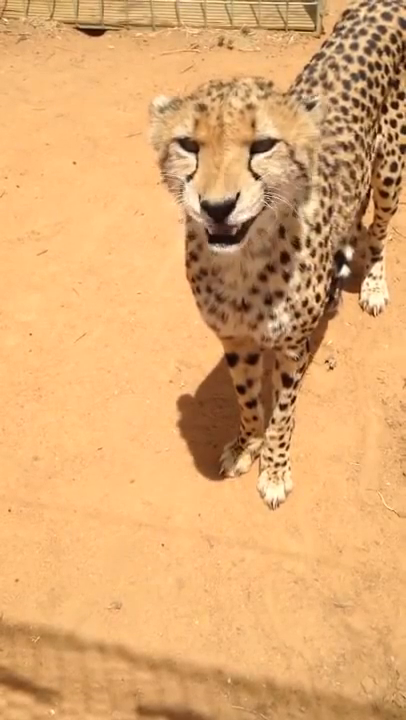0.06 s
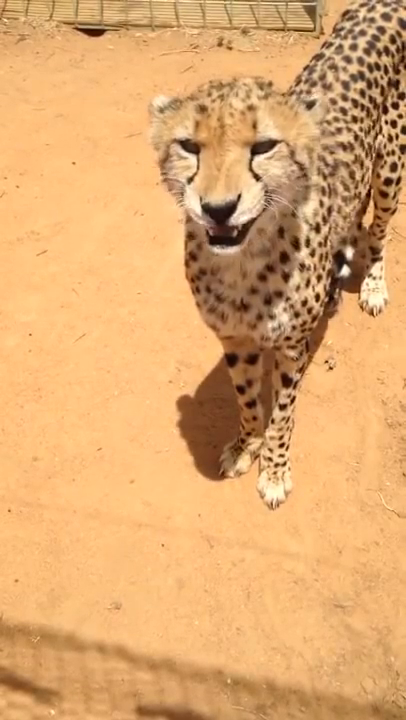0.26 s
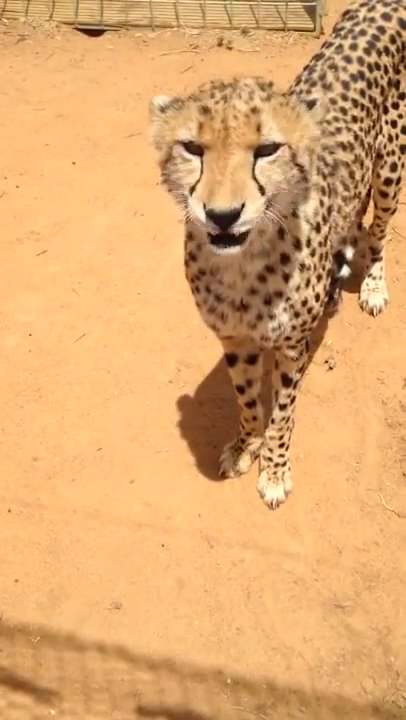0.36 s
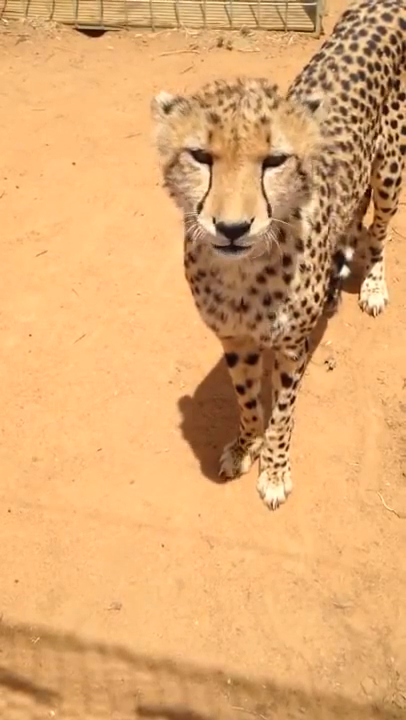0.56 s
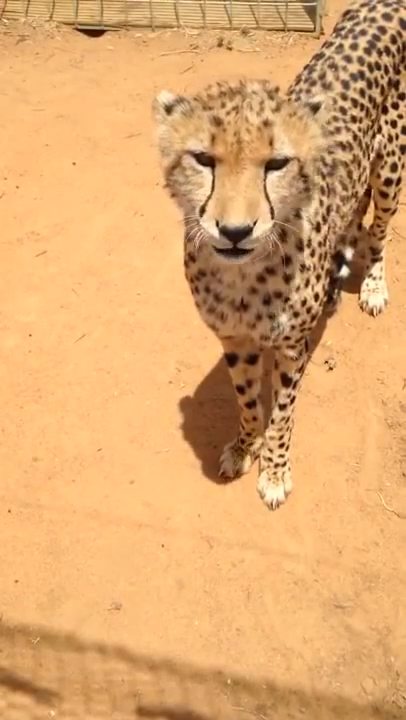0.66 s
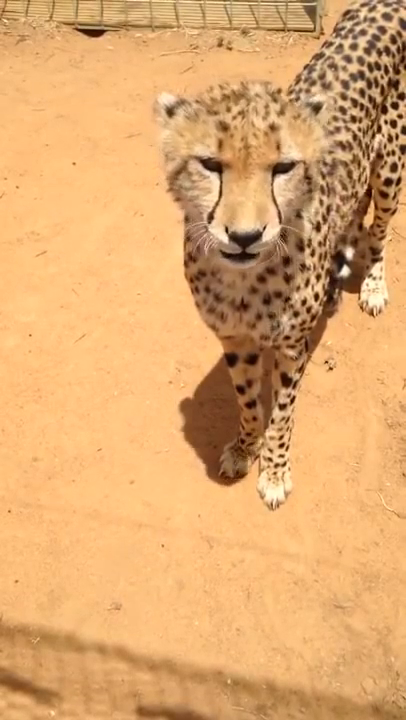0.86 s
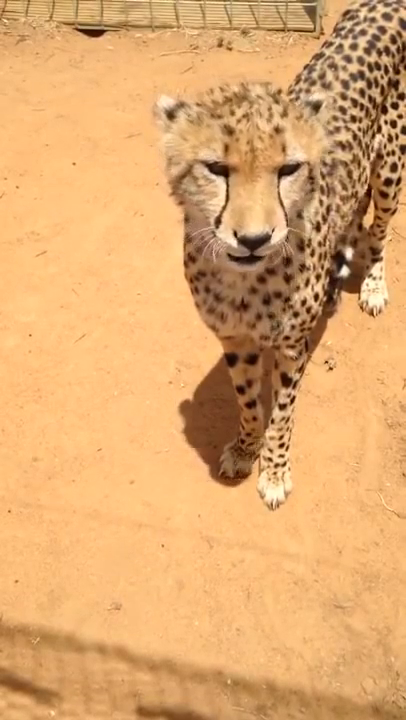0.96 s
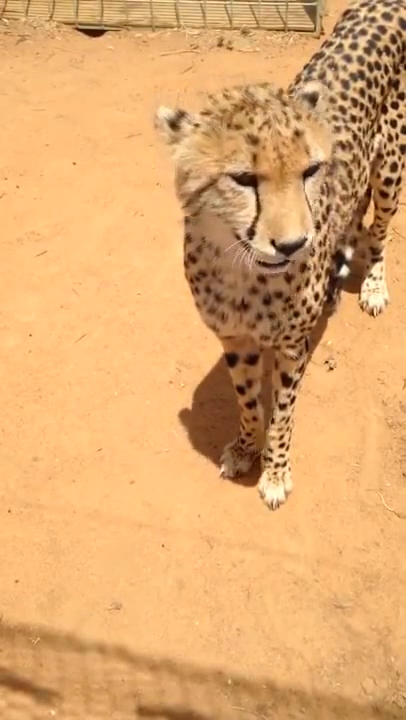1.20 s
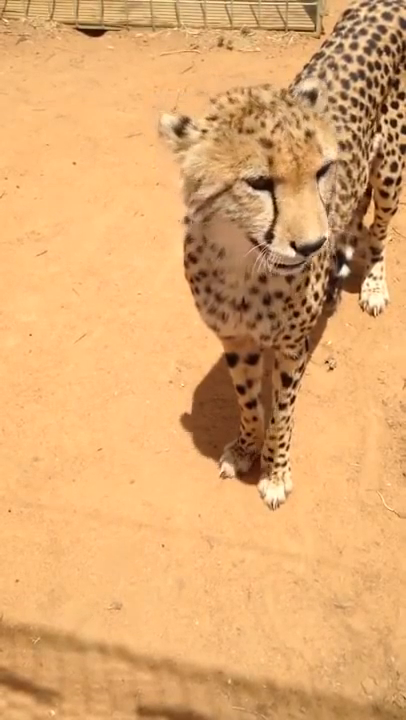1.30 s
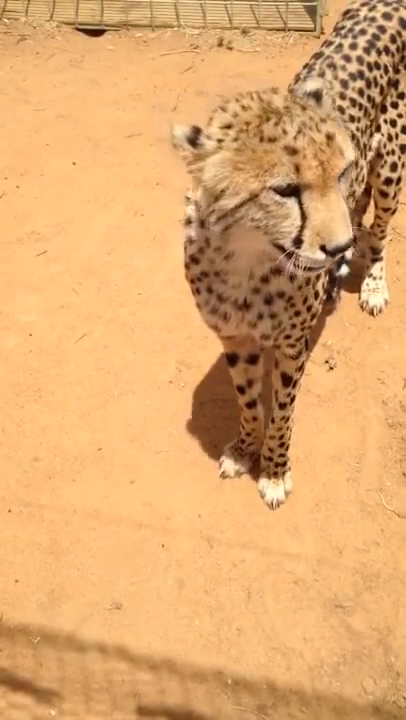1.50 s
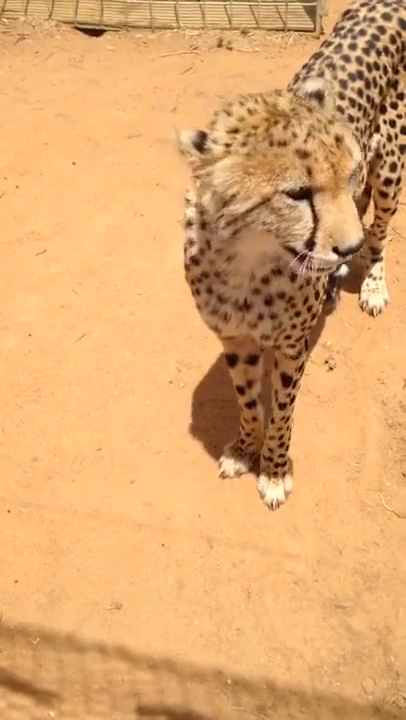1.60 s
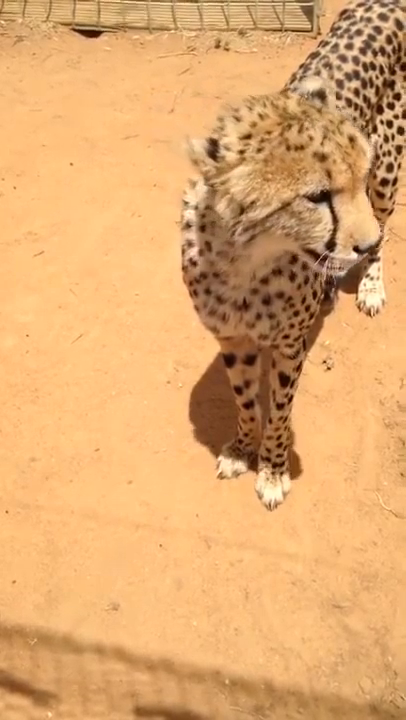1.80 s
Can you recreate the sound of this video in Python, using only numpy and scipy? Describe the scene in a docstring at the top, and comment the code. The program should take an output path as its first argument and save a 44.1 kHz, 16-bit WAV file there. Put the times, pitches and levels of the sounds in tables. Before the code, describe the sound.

A cheetah meows once, close and dry, in a quiet open yard. Faint wet mouth clicks come at 0.05 seconds; the high, almost whistled call runs from 0.19 to 0.67, arching up, then falling and roughening slightly, with a nasal puff at 0.7. A thin insect buzz continues throughout. Faint birds chirp, clearest near 1.36. Two small hollow knocks near the microphone land at 1.7 and 1.8.

```python
"""Cat meow in a yard

A cat gives one near-pure, arching meow close by: a gliding sine whose overtones change as the mouth shuts.
Split fold cycles and rasp roughen it briefly; wet clicks precede it and a puff of nasal noise ends it. An
insect buzzes high (toothed wings as a pulse train) and small birds chirp further off (gliding sines). Filtered
noise is the quiet open air; late on, two small knocks (damped resonances) sound near the microphone."""
import sys
import numpy as np
from scipy import signal
from scipy.fft import rfft, irfft
from scipy.io import wavfile
from scipy.ndimage import uniform_filter1d

SR = 44100
rng = np.random.default_rng(int(sys.argv[2]) if len(sys.argv) > 2 else 0)


def log_audio(samples):
    """Write samples as a 16-bit WAV file to the path given in sys.argv[1]."""
    # one column per channel
    frames = np.atleast_2d(samples).T
    # limit to full scale, then quantise
    limited = np.clip(frames, -1, 1)
    pcm = np.round(limited * 32767).astype(np.int16)
    wavfile.write(sys.argv[1], SR, pcm)


N = 81585  # samples


def undb(db):
    """Decibel law: level to amplitude gain."""
    return 10 ** (np.asarray(db) / 20)


def unit(x):
    """Energy normalisation: scale to rms 1."""
    return x / np.sqrt(np.mean(x ** 2))


def peaked(x):
    """Peak normalisation: scale to peak 1."""
    return x / np.abs(x).max()


def times():
    """Uniform sampling: the time of every sample in seconds."""
    return np.arange(N) / SR


def curve(rows):
    """Linear interpolation: join (time, value) rows by straight lines."""
    return np.interp(times(), *np.array(rows, float).T)


def gain_at(hz, points):
    """Spectral envelope: gain from (Hz, dB) points, interpolated over log frequency."""
    point_hz, db = np.array(points, float).T
    log_hz = np.log(np.maximum(hz, 1))
    return undb(np.interp(log_hz, np.log(np.maximum(point_hz, 1)), db))


def colour(x, points):
    """Linear filtering: shape the spectrum by (Hz, dB) points, then scale to rms 1."""
    gain = gain_at(np.fft.rfftfreq(N, 1 / SR), points)
    return unit(irfft(rfft(x) * gain, N))


def noise():
    """White noise: equal mean power at every frequency."""
    return rng.standard_normal(N)


def walk(rate):
    """Random modulation: noise smoothed twice over 1/rate seconds, with rms 1."""
    width = max(int(SR / rate), 1)
    smooth = uniform_filter1d(noise(), width)
    return unit(uniform_filter1d(smooth, width))


def ring(x, hz, width_hz):
    """Simple resonance: a bandpass with gain 1 at its centre."""
    return signal.lfilter(*signal.iirpeak(hz, hz / width_hz, fs=SR), x)


def ring_twice(x, hz, width_hz):
    """Cascaded resonance: the same bandpass twice, for steeper skirts."""
    return ring(ring(x, hz, width_hz), hz, width_hz)


def impulse(at):
    """Impulsive excitation: one unit sample at the given time."""
    return signal.unit_impulse(N, min(int(at * SR), N - 1))


def half_sine_swell(start, length):
    """Smooth onset and release: the square root of half a sine, zero outside its span."""
    along = np.clip((times() - start) / length, 0, 1)
    return np.sqrt(np.abs(np.sin(np.pi * along)))


def echoes(x, t60):
    """Diffuse scattering from ground, fence and bushes: convolution with decaying noise."""
    tail = noise() * np.exp(-np.log(1000) * times() / t60)
    return signal.fftconvolve(x, tail / np.linalg.norm(tail))[:N]


# spectrum of the open air: (frequency [Hz], relative density [dB per Hz])
AIR_SPECTRUM = [(20, -33.5), (40, -10.5), (70, -5.5), (130, -4.5), (250, -9.5), (400, -12), (835, -17.5),
                (1260, -19.5), (1660, -19), (2950, -21), (6000, -25), (7800, -48)]
AIR_DB, HISS_DB = -70.5, -76


def air():
    """Broadband noise: quiet open air, gently stirring in level, over an even hiss."""
    lowpass = signal.butter(4, 6500, fs=SR, output="sos")
    low = signal.sosfilt(lowpass, colour(noise(), AIR_SPECTRUM))
    return undb(AIR_DB + .3 * walk(5)) * low + undb(HISS_DB) * noise()


# mean tooth rate, before the stroke's speed ratio: (time [s], strikes per second [1/s])
TOOTH_RATE = [(0, 687), (.15, 679), (.25, 697), (.45, 679), (.58, 684), (.78, 682), (.95, 692), (1.08, 680),
              (1.23, 674), (1.31, 699), (1.5, 694), (1.68, 679), (1.85, 682)]
# course of the buzz, before INSECT_TRIM_DB: (time [s], level [dB])
INSECT_LEVEL = [(0.0, -58), (0.182, -57), (0.19, -60), (0.504, -61), (0.532, -63), (0.786, -60),
                (1.436, -60), (1.68, -62)]
# one wing stroke: (share of the beat [0-1], tooth speed ratio [1], level [dB])
STROKE = [(0, .985, -15), (.12, .988, -1.5), (.35, .995, 0), (.56, 1.014, -4), (.73, 1.011, -1.5),
          (.88, .987, -6), (1, .975, -15)]
# radiation of the wing: (frequency [Hz], relative gain [dB])
WING_COLOUR = [(6100, -40), (6850, -21.5), (7500, -9), (8200, -3), (8900, -14), (9600, -25), (10400, -34.5),
               (11500, -53)]
INSECT_TRIM_DB, INSECT_ECHO_DB = -2, -6
WINGBEAT_HZ, TOOTH_JITTER, TOOTH_SCATTER_DB = 58, .004, 1


def insect():
    """Stridulation: each wingbeat drags teeth over a scraper, speeding up and then braking."""
    beats = np.cumsum(WINGBEAT_HZ * (1 + .02 * walk(11))) / SR
    beat = beats.astype(int)
    share, speeds, levels = np.array(STROKE).T
    speed = np.interp(beats % 1, share, speeds)
    press_db = np.interp(beats % 1, share, levels)
    # every beat draws its own tooth phase, loudness and speed
    offset, size, haste = rng.standard_normal((beat.max() + 1, 3))[beat].T
    rate = curve(TOOTH_RATE) * speed * (1 + 0.0059 * haste + TOOTH_JITTER * walk(400))
    teeth = 2 * np.pi * (np.cumsum(rate) / SR + offset)
    # only the harmonics within the wing's band
    strikes = sum(np.cos(k * teeth) for k in range(9, 17))
    pressed = strikes * undb(press_db + 0.92 * size + TOOTH_SCATTER_DB * walk(500))
    song = colour(pressed, WING_COLOUR)
    blurred = unit(song + undb(INSECT_ECHO_DB) * echoes(song, .12))
    return undb(curve(INSECT_LEVEL) + INSECT_TRIM_DB) * blurred


# wet clicks of the opening mouth: (time [s], peak level [dB])
SMACKS = [(.046, -42.5), (0.049, -44.5), (0.0555, -47), (.058, -50), (0.0634, -45), (0.0683, -50.5)]
# modes of the mouth, before a random detuning: (frequency [Hz], t60 [s], relative level [dB])
SMACK_MODES = [(1210, 0.0044, -40), (1720, 0.017, 7.5), (2820, 0.0028, 13), (5030, 0.0047, 3)]


def smacks():
    """Modal ringing: tongue and lips part in a few clicks that excite the mouth's damped modes."""
    out = 0
    spreads = rng.standard_normal((len(SMACKS), len(SMACK_MODES)))
    for (at, db), spread in zip(SMACKS, spreads):
        age = np.maximum(times() - at, 0)
        click = 0
        for (hz, t60, mode_db), s in zip(SMACK_MODES, spread):
            decay = np.exp(-np.log(1000) * age / t60)
            click = click + undb(mode_db) * decay * np.sin(2 * np.pi * hz * (1 + 0.088 * s) * age)
        out = out + undb(db) * peaked(click)
    return out


# bird chirps, level before flutter and envelope: (time [s], length [s], start frequency [Hz],
# frequency approached [Hz], level [dB], glide time constant as share of the length [1])
CHIRPS = [(.088, 0.02, 5430, 2780, -74, 0.65), (0.775, 0.026, 4070, 2310, -74, 0.68),
          (0.793, 0.044, 3180, 2690, -79.5, 0.42), (0.843, 0.043, 1900, 2055, -77, 0.41),
          (0.902, 0.15, 1665, 1743, -79.5, 0.3), (0.974, 0.033, 4480, 2640, -72, 0.88),
          (1.182, 0.053, 1557, 2980, -72.5, 0.67), (1.184, 0.057, 3260, 2760, -73, .4),
          (1.234, 0.0587, 3235, 2595, -73, 0.64), (1.349, .009, 4200, 6340, -70.5, 0.76),
          (1.361, 0.089, 7040, 3490, -57, 0.23), (1.508, 0.0105, 5250, 2560, -63, 0.8),
          (1.519, 0.034, 2820, 2540, -73.5, 0.43), (1.523, 0.035, 4110, 1100, -76, 0.71)]
CHIRP_PEAK_SHARE, CHIRP_FLUTTER_DB = 0.4, 2.5
BIRD_ECHO_DB, BIRD_ECHO_T60_S = -5, 0.19


def birds():
    """Frequency modulation: thin whistles glide exponentially, blurred by distance."""
    out = 0
    for at, length, from_hz, to_hz, db, glide in CHIRPS:
        along = np.clip((times() - at) / length, 0, 1)
        hz = to_hz + (from_hz - to_hz) * np.exp(-along / glide)
        shape = np.interp(along, [0, CHIRP_PEAK_SHARE, 1], [0, 1, 0]) ** 1.1
        whistle = np.sqrt(2) * np.sin(2 * np.pi * np.cumsum(hz) / SR)
        out = out + undb(db + CHIRP_FLUTTER_DB * walk(250)) * shape * whistle
    return out + undb(BIRD_ECHO_DB) * echoes(out, BIRD_ECHO_T60_S)


# the call's fundamental, before jitter and shimmer: (time [s], pitch [Hz], level [dB])
MEOW = [(0.186, 822.6, -74), (.199, 858.4, -37), (0.214, 873.3, -38), (.24, 901.4, -34),
        (0.302, 924.3, -31.5), (.37, 952.3, -27.5), (.4, 950, -27.5), (0.461, 930, -30), (.505, 905.8, -32),
        (0.546, 903.6, -31), (0.584, 861, -35.5), (0.616, 834.7, -36), (0.645, 774.5, -34.5),
        (0.651, 757, -41), (0.657, 690, -38.5), (.666, 650, -50)]
# closing of the mouth: (time [s], closure [0 open - 1 shut])
MOUTH = [(.22, 0.38), (.4, 0.021), (.47, 0.66), (.53, 0.88), (.575, 0.95), (.66, 1)]
# overtones against the fundamental, mouth open: (frequency [Hz], level [dB])
OPEN_MOUTH = [(1650, -24.5), (1820, -50.5), (1900, -35), (2700, -19), (2850, -32), (3700, -57.5),
              (4700, -48), (5400, -52.5), (5650, -73.5), (6600, -53.5), (7600, -59)]
# overtones against the fundamental, mouth shut: (frequency [Hz], level [dB])
SHUT_MOUTH = [(1400, -23.5), (1600, -33), (1700, -14), (1830, -20.5), (2600, -34), (3350, -25), (3650, -31),
              (4300, -52), (5000, -45), (5200, -26.5), (5450, -40.5), (5650, -60.5), (7600, -60)]
# rasp in the voice: (time [s], level against the tone [dB])
RASP = [(.19, -46.5), (.26, -46), (.4, -50), (.45, -34), (.55, -36), (.61, -40), (.649, -29.5), (.657, -15)]
# spectrum of the rasp: (frequency [Hz], relative density [dB per Hz])
RASP_COLOUR = [(200, -21), (800, 3), (1500, -7), (2200, -0.5), (3000, -13), (4700, -9), (6000, -26.5),
               (12000, -43)]
# the folds fall into a longer cycle, level before colour and flutter:
# (start [s], end [s], periods per cycle [1], level [dB])
SPLITS = [(.42, 0.53, 3, -58.5), (0.49, .595, 2, -64)]
# tones between the harmonics: (frequency [Hz], relative level [dB])
SPLIT_COLOUR = [(300, -23), (700, -35), (1230, 3), (1400, -6), (1550, -8), (1800, -24.5), (2170, -17),
                (2500, -23), (4500, -37.5), (7000, -48.5)]
JITTER, SHIMMER_DB, OVERTONE_FLUTTER_DB = 0.0027, 0.35, 1  # jitter as share of the pitch
SPLIT_FLUTTER_DB, SPLIT_WANDER_RAD = 3, .1


def meow():
    """Source and filter: the closing mouth reshapes the overtones; split fold cycles add subharmonics."""
    t, rows = times(), np.array(MEOW)
    hz = curve(rows[:, :2]) * (1 + JITTER * walk(150))
    phase = 2 * np.pi * np.cumsum(hz) / SR
    sounding = (t > rows[0, 0]) * (t < rows[-1, 0])
    loud = undb(curve(rows[:, ::2]) + SHIMMER_DB * walk(180)) * sounding
    shut = np.clip(curve(MOUTH), 0, 1)
    voice = np.sin(phase)
    for k in range(2, 7):
        throat = gain_at(k * hz, OPEN_MOUTH) ** (1 - shut) * gain_at(k * hz, SHUT_MOUTH) ** shut
        voice = voice + throat * undb(OVERTONE_FLUTTER_DB * walk(73)) * np.sin(k * phase)
    # the rasp pulses once per fold cycle
    pulsed_noise = noise() * (1 + np.cos(phase))
    rasp = undb(curve(RASP)) * colour(pulsed_noise, RASP_COLOUR)
    out = loud * (np.sqrt(2) * voice + rasp)
    for start, end, periods, db in SPLITS:
        count = round(periods)
        slow = phase / count + SPLIT_WANDER_RAD * walk(90)
        between = 0
        for k in range(1, 6 * count):
            if k % count:  # skip the voice's own harmonics
                between = between + gain_at(k * hz / count, SPLIT_COLOUR) * np.sin(k * slow)
        swell = half_sine_swell(start, end - start)
        out = out + undb(db + SPLIT_FLUTTER_DB * walk(110)) * swell * between
    return out


# spectrum of the puff: (frequency [Hz], relative density [dB per Hz])
PUFF_COLOUR = [(80, -27), (250, 9.5), (600, 0.5), (1150, 4.5), (1700, -6), (2500, -3), (3500, -10),
               (4600, -17), (6000, -19.5), (12000, -62)]
PUFF_S, PUFF_ATTACK_S, PUFF_HOLD_S, PUFF_DECAY_S, PUFF_DB = .707, 0.0014, 0.033, 0.029, -58.5
NOSE_S, NOSE_LENGTH_S, NOSE_HZ, NOSE_WIDTH_HZ, NOSE_DB, LEAK_DB = 0.62, 0.13, 4540, 470, -73, -64.5


def puff():
    """Turbulent flow: air leaks through the nose as the call ends, then the rest is let out at once."""
    age = times() - PUFF_S
    decay = np.exp(-np.maximum(age - PUFF_HOLD_S, 0) / PUFF_DECAY_S)
    burst = np.clip(age / PUFF_ATTACK_S, 0, 1) * decay
    flow = half_sine_swell(NOSE_S, NOSE_LENGTH_S)
    nostrils = unit(ring_twice(noise(), NOSE_HZ, NOSE_WIDTH_HZ))
    strength = np.hypot(undb(PUFF_DB) * burst, undb(LEAK_DB) * flow)
    return strength * colour(noise(), PUFF_COLOUR) + undb(NOSE_DB) * flow * nostrils


LIP_S, LIP_DECAY_S, LIP_HZ, LIP_WIDTH_HZ, LIP_DB = .629, 0.00094, 4730, 1600, -49  # peak level


def lip_tick():
    """Transient excitation: a tiny noise burst rings bright at the mouth just before the call ends."""
    age = times() - LIP_S
    burst = noise() * (age > 0) * np.exp(-np.abs(age) / LIP_DECAY_S)
    return undb(LIP_DB) * peaked(ring_twice(burst, LIP_HZ, LIP_WIDTH_HZ))


# knocks near the microphone:
# (time [s], peak level of the body [dB], body pitch ratio [1], thud against the body [dB])
KNOCKS = [(1.6963, -36, 0.79, -25.5), (1.805, -30.5, 0.9, -17)]
KNOCK_HZ, KNOCK_WIDTH_HZ = 732, 430  # body centre before the pitch ratio
THUD_HZ, THUD_WIDTH_HZ = 108, 75
TICK_DB, RATTLE_DB, RATTLE_DECAY_S = -3.5, -19.5, 0.011  # levels against the body


def knocks():
    """Impact response: a sharp tick, a heavily damped hollow body, a low thud and a short rattle."""
    out = 0
    for at, db, ratio, thud_db in KNOCKS:
        hit, age = impulse(at), times() - at
        body = peaked(ring_twice(hit, KNOCK_HZ * ratio, KNOCK_WIDTH_HZ))
        tick = undb(TICK_DB) * peaked(ring(ring(hit, 3800, 8000), 4200, 7600))
        low = ring(ring(hit, THUD_HZ, THUD_WIDTH_HZ), THUD_HZ, 3 * THUD_WIDTH_HZ)
        thud = undb(thud_db) * peaked(low)
        grain = unit(ring(ring(noise(), 520, 600), 660, 2100))
        rattle = undb(RATTLE_DB) * grain * (age > 0) * np.exp(-np.abs(age) / RATTLE_DECAY_S)
        out = out + undb(db) * (tick - body + thud + rattle)
    return out


YARD_DB, YARD_T60_S = -39, 0.11


def scene():
    """Superposition: the cat with its yard echo, the knocks, insect, birds and air add up."""
    cat = meow() + puff() + smacks() + lip_tick()
    yard = undb(YARD_DB) * echoes(cat, YARD_T60_S)
    return (cat + yard + knocks() + insect() + birds() + air())[None]


TOP_HZ = 15280


def record(dry):
    """Band limiting: the recorder cuts steeply above TOP_HZ."""
    lowpass = signal.ellip(10, .1, 80, TOP_HZ, fs=SR, output="sos")
    return signal.sosfilt(lowpass, dry)


dry = scene()
out = record(dry)
log_audio(out)
```